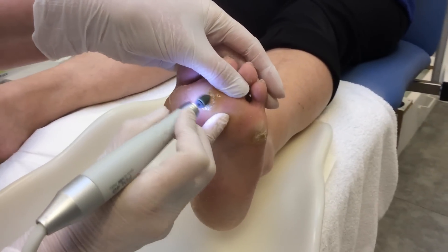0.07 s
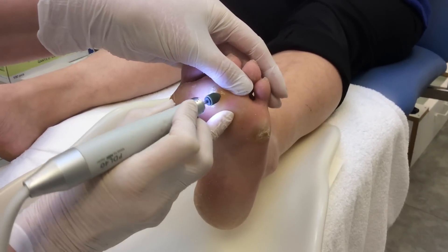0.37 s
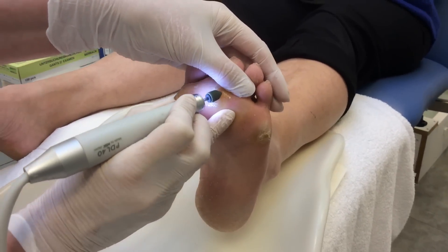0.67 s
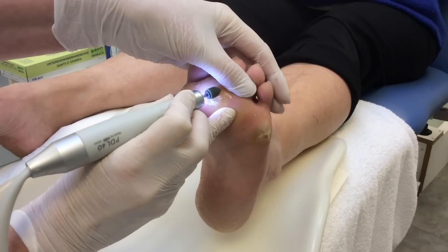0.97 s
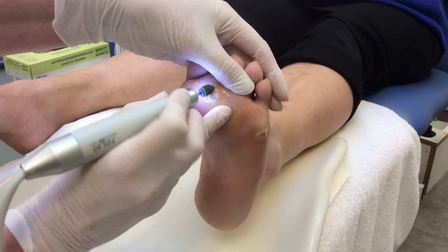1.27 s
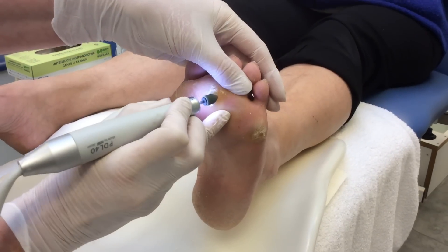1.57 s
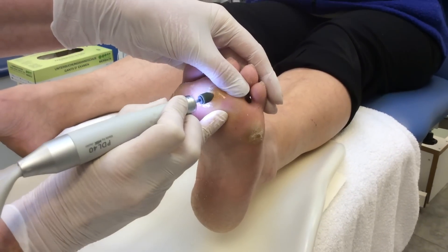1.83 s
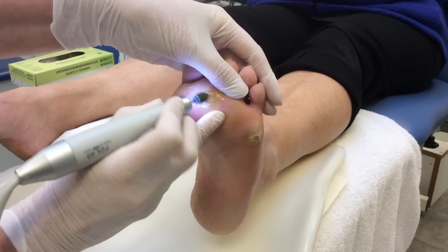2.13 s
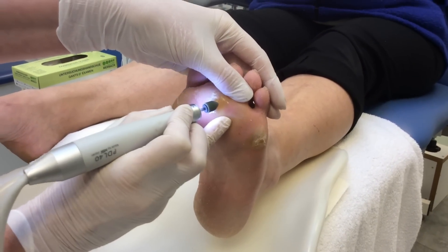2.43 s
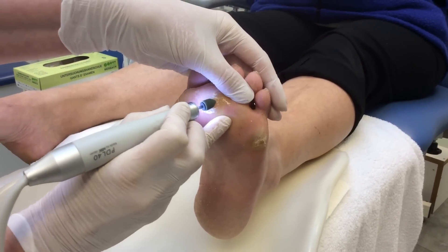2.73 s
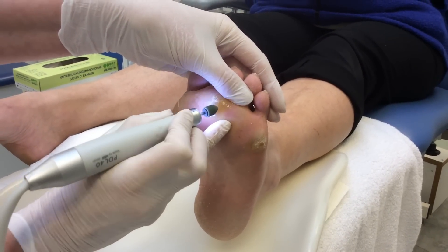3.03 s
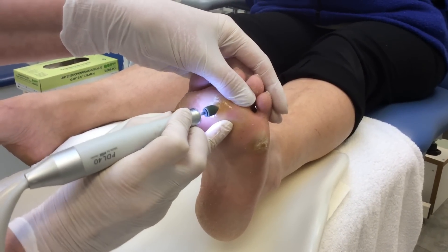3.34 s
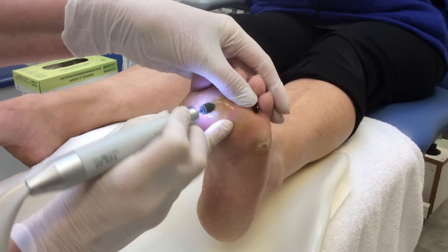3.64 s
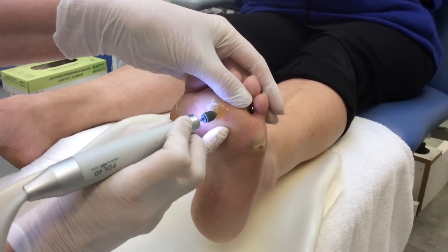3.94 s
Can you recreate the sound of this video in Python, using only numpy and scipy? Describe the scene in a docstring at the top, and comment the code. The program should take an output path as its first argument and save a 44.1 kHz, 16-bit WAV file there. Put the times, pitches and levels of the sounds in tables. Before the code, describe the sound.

Electric foot drill grinds hard skin four times, buzzing and squealing over a humming suction pump.

```python
"""A pedicure drill buzzes, squeals and rasps against hard skin, close by, in four strokes.
The burr slows under load. Once a turn it knocks the handpiece into ringing and drags its grit
over the skin, now and then catching an edge. Behind it the suction pump throbs steadily
over faint mains hum, and air hisses into the nozzle above the low rush of the room."""
import sys
import numpy as np
from scipy import signal
from scipy.fft import rfft, irfft
from scipy.io import wavfile
from scipy.ndimage import uniform_filter1d, map_coordinates

SR = 44100
rng = np.random.default_rng(int(sys.argv[2]) if len(sys.argv) > 2 else 0)


def generate_wav(signal):
    """Clip the signal to [-1, 1] and save it as 16-bit WAV at the path in sys.argv[1]."""
    frames = np.transpose(np.atleast_2d(signal))
    scaled = np.clip(frames, -1, 1) * 32767
    pcm = np.round(scaled).astype(np.int16)
    wavfile.write(sys.argv[1], SR, pcm)


N = 176400


def undb(db):
    """Decibels to gain."""
    return 10 ** (np.asarray(db) / 20)


def unit(x):
    """Scale to rms 1."""
    return x / np.sqrt(np.mean(x ** 2))


def walk(rate_hz):
    """Smooth random drift, spread near 1."""
    hold = int(SR / rate_hz)
    steps = np.repeat(rng.standard_normal(N // hold + 1), hold)
    return 1.296 * uniform_filter1d(uniform_filter1d(steps, hold), hold)[:N]


def colour(x, curve):
    """Minimum-phase filter through (freq_hz, gain_db) points; rms 1."""
    hz, db = np.array(curve, float).T
    bins_hz = np.maximum(np.fft.rfftfreq(N, 1 / SR), 1)
    gain = undb(np.interp(np.log(bins_hz), np.log(hz), db))
    cepstrum = irfft(np.log(gain), N)
    cepstrum[1:N // 2] *= 2
    cepstrum[N // 2 + 1:] = 0
    return unit(irfft(rfft(x) * np.exp(rfft(cepstrum)), N))


def ring(x, modes):
    """Drive damped (pitch_hz, width_hz, gain_db) resonances; rms 1."""
    s = 1j * np.fft.rfftfreq(N, 1 / SR)
    response = sum(undb(db) * width * s / (s * s + width * s + hz * hz) for hz, width, db in modes)
    return unit(irfft(rfft(x) * response, N))


def swells(t, rows):
    """Sum of bell-shaped gains."""
    return sum(undb(db) * np.exp(-((t - centre_s) / half_s) ** 2) for centre_s, half_s, db in rows)


def contact(t, stroke, release_s=0.014):
    """Knocking and rubbing gains of one stroke, fading quickly outside it."""
    time_s, knock_db, rub_db = np.array(stroke).T
    outside_s = np.maximum(0, np.maximum(time_s[0] - t, t - time_s[-1]))
    fade = np.exp(-outside_s / release_s)
    return [undb(np.interp(t, time_s, db)) * fade for db in (knock_db, rub_db)]


# Skin contact, one list per stroke: time_s, knock_db, rub_db
STROKES = [
    [(0.325, -78, -51.5), (0.335, -72, -46), (0.385, -82, -47.5), (0.495, -76, -48), (0.539, -55, -47.5),
     (0.567, -56, -47.5), (0.599, -60, -46.5), (0.637, -56.5, -47), (0.751, -54.5, -48.5),
     (0.783, -51.5, -45), (0.903, -54.5, -52), (1.055, -60, -50.5), (1.155, -55.5, -49.5),
     (1.207, -61.5, -53.5), (1.263, -61, -48.5), (1.32, -78, -52)],
    [(1.6, -81, -53), (1.624, -71, -46.5), (1.838, -70.5, -43.5), (1.852, -79, -42), (1.884, -51, -45.5),
     (1.912, -57.5, -48.5), (1.966, -57, -46), (2.018, -59, -41.5), (2.084, -56.5, -42.5), (2.16, -67, -53)],
    [(2.41, -75, -53), (2.42, -87, -48), (2.464, -65, -49), (2.54, -56.5, -46), (2.586, -57, -47.5),
     (2.722, -53.5, -44.5), (2.77, -59, -43.5), (2.79, -52, -45), (2.896, -55, -53.5), (2.93, -54, -45.5),
     (2.962, -58, -43), (2.985, -74, -52)],
    [(3.2, -73, -52), (3.206, -84, -56), (3.244, -66, -50.5), (3.296, -66, -52), (3.334, -63, -44),
     (3.368, -62, -53), (3.542, -48.5, -43), (3.562, -60, -49), (3.57, -51.5, -47.5), (3.644, -57, -54),
     (3.666, -50.5, -50), (3.684, -66, -47.5), (3.712, -64, -51), (3.715, -73, -61)],
]
# Grip, one row per stroke: squeal_hz, squeal_gain_db, buzz_gain_db, whine_gain_db
GRIPS = [(2000, -1, -6, -16), (2110, -2, -6, -11), (2050, -3.5, -5, -16.5), (1900, -3.5, -6, -12.5)]
# Light brushes of the burr: centre_s, half_width_s, level_db
LIGHT_BRUSHES = [(0.03, 0.055, -50.5), (4.0, 0.026, -51.5)]
# Burr catching an edge: centre_s, half_width_s, level_db
EDGE_CATCHES = [(0.398, .02, -46.5), (.8, 0.026, -54), (1.833, 0.017, -48), (2.035, 0.024, -62),
                (2.535, 0.023, -53), (2.736, 0.034, -56)]
# Burr shank resonances: pitch_hz, width_hz, gain_db
SHANK_MODES = [(3260, 80, -1.5), (4940, 300, -4.5), (5370, 87, -8), (6600, 100, -3.5)]
# Burr head resonances: pitch_hz, width_hz, gain_db
HEAD_MODES = [(4750, 200, -2), (6500, 710, -2), (8600, 2000, 12), (10700, 900, -8)]
# Spectrum of grit on skin: freq_hz, gain_db
RASP_CURVE = [(300, -23.5), (1200, -13), (2600, -9.5), (3250, -6.5), (3650, -6), (4100, -3), (4700, -3.5),
              (5250, -6), (5800, 2.5), (6150, -0.5), (6550, 0), (7200, -3), (8700, 1.5), (9800, -3),
              (10900, 0), (13000, -7), (15500, -22.5)]


def drill(t, squeal_width_hz=347, drag_gain_db=-22, rasp_gain_db=0.06, tick_gain_db=-17.5):
    """Each turn the burr knocks and scrapes, ringing handpiece, shank and head over the motor's buzz."""
    speed_hz, turns = rotation(t)
    knock_scatter, bite_scatter = rng.standard_normal((N // 100, 2)).T  # indexed by turn
    pulses = knock_pulses(speed_hz, turns, knock_scatter)
    scrape = grit(t, turns, bite_scatter)
    knocks = unit(pulses) + 0.36 * scrape
    buzz = motor(turns)
    whine = ring(knocks, SHANK_MODES)
    pressure = swells(t, LIGHT_BRUSHES)
    handpiece = np.zeros(N)
    for stroke, (squeal_hz, squeal_db, buzz_db, whine_db) in zip(STROKES, GRIPS):
        knocking, rubbing = contact(t, stroke)
        mode = [(squeal_hz, squeal_width_hz, 0)]
        squeal = ring(ring(knocks, mode), mode)
        handpiece += squeal * knocking * undb(squeal_db)
        handpiece += buzz * (knocking * undb(buzz_db) + rubbing * undb(drag_gain_db))
        handpiece += whine * rubbing * undb(whine_db)
        pressure += rubbing
    rasp = colour(scrape, RASP_CURVE) * pressure * undb(rasp_gain_db)
    ticks = ring(pulses, HEAD_MODES) * (pressure * undb(tick_gain_db) + swells(t, EDGE_CATCHES))
    return handpiece + rasp + ticks


# Burr speed, one list per stroke: time_s, speed_hz
BURR_SPEED = [
    [(.32, 194), (.39, 180), (.46, 174), (.51, 155), (.56, 153), (.6, 146), (.65, 159), (.72, 150),
     (.78, 151.5), (.86, 140), (.91, 143.5), (.97, 140), (1.04, 144.5), (1.11, 151.5), (1.18, 156),
     (1.25, 165), (1.32, 188)],
    [(1.59, 192), (1.71, 177.5), (1.77, 177), (1.82, 165), (1.9, 168.5), (2.02, 165.5), (2.1, 160),
     (2.16, 188)],
    [(2.41, 194), (2.49, 176), (2.62, 162.3), (2.71, 163.3), (2.76, 165.3), (2.8, 163.7), (2.86, 166),
     (2.92, 162), (2.98, 186)],
    [(3.19, 194), (3.25, 182.5), (3.3, 180), (3.4, 165), (3.45, 163.8), (3.49, 161.7), (3.56, 164),
     (3.64, 165), (3.72, 188)],
]


def rotation(t, jitter=0.003):
    """The burr slows under load; returns its speed and running count of turns."""
    speed_hz = np.interp(t, *np.vstack(BURR_SPEED).T)
    speed_hz = uniform_filter1d(speed_hz, SR // 50) * (1 + jitter * walk(60))
    return speed_hz, np.cumsum(speed_hz) / SR


def knock_pulses(speed_hz, turns, scatter, scatter_db=1):
    """One band-limited knock a turn, uneven in strength."""
    nearest = np.round(turns).astype(int)
    offset_samples = (turns - nearest) * SR / speed_hz
    pulses = np.sinc(offset_samples) * np.exp(-(offset_samples / 4) ** 2)
    return pulses * undb(scatter_db * scatter[nearest])


def grit(t, turns, scatter, repeat_share=0.79, wear_per_s=16, bite_decay_turns=0.2, grain_db=3.5):
    """Grit bites once a turn; its roughness comes round again, changing as the skin wears."""
    size = 256
    surface = rng.standard_normal((size, size))
    position = [t * wear_per_s, turns % 1 * size]
    repeating = unit(map_coordinates(surface, position, order=3, mode="grid-wrap"))
    drag = np.sqrt(repeat_share) * repeating + np.sqrt(1 - repeat_share) * rng.standard_normal(N)
    bite_db = -3 + 2 * scatter[turns.astype(int)]
    bite = 1 + np.exp(-(turns % 1) / bite_decay_turns) * undb(bite_db)
    return unit(drag * bite * undb(grain_db * walk(4000)))


# Buzz of the loaded motor: shaft_multiple, gain_db
MOTOR_PARTIALS = [(4, -4.5), (5, -6), (6, -3.5), (7, -7), (8, 0), (9, -4), (10, -1.5), (11, -5), (14, -2),
                  (15, -7.5), (19, -6.5), (20, -5.5)]


def motor(turns, flutter_db=3.5):
    """Partials locked to the shaft, each wavering in level by itself."""
    buzz = np.zeros(N)
    for multiple, db in MOTOR_PARTIALS:
        partial = np.sin(2 * np.pi * (multiple * turns + rng.random()))
        buzz += partial * undb(db + flutter_db * walk(29.93))
    return unit(buzz)


# Suction pump throb: harmonic, gain_db
PUMP_PARTIALS = [(1, -17.5), (2, -14.5), (3, -15.5), (4, -15.5), (5, -21), (6, -28.5), (7, -4), (8, 1),
                 (9, -19.5), (10, -15.5), (11, -11.5), (12, -22.5), (13, -12.5), (14, -30.5), (15, -17.5),
                 (16, -20.5), (17, -13.5), (18, -16), (19, -12), (20, -17), (21, -33), (22, -23), (23, -21)]


def pump(rate_hz=45.22, level_db=-54, wander=0.00069, offset_s=0.02, delay_s_per_khz=0.00808):
    """The pump throbs once a cycle; its upper partials arrive later, blurred by the room."""
    cycles = np.cumsum(rate_hz * (1 + wander * walk(4.9))) / SR - offset_s * rate_hz
    throb = np.zeros(N)
    for harmonic, db in PUMP_PARTIALS:
        hz = harmonic * rate_hz
        lag_cycles = delay_s_per_khz / 1000 * hz ** 2 / 2
        lag_cycles += rng.uniform(-.5, .5) * (hz / 900) ** 2  # phase fully random from 900 Hz up
        throb += undb(db) * np.sin(2 * np.pi * (harmonic * cycles - lag_cycles))
    return unit(throb) * undb(level_db)


def mains_hum(t, pitch_hz=99.9, level_db=-72.5):
    """Mains hum, beating against the pump."""
    return unit(np.sin(2 * np.pi * pitch_hz * t)) * undb(level_db)


# Spectrum of air at the nozzle: freq_hz, gain_db
NOZZLE_CURVE = [(880, -35), (1500, -12.5), (1680, -14.5), (1750, -21), (1960, -13.5), (2250, -15),
                (2890, -15), (3270, -13.5), (4290, -8.5), (6240, -6), (8660, -3), (9450, -2), (15000, -2)]


def nozzle_hiss(level_db=-47.5, flutter_db=0.15):
    """Air drawn into the nozzle hisses steadily."""
    return colour(rng.standard_normal(N), NOZZLE_CURVE) * undb(level_db + flutter_db * walk(15))


# Spectrum of the room: freq_hz, gain_db
ROOM_CURVE = [(25, -12), (60, -7.5), (150, -1.5), (260, -1), (400, 2), (800, -7), (1200, -3.5),
              (2000, -18.5), (5000, -75)]


def room_rush(level_db=-65.5):
    """Low, steady rush of the room."""
    return colour(rng.standard_normal(N), ROOM_CURVE) * undb(level_db)


def scene():
    """Drill over pump, hum and air, the same in both channels."""
    t = np.arange(N) / SR
    mix = drill(t) + pump() + mains_hum(t) + nozzle_hiss() + room_rush()
    return np.tile(mix, (2, 1))


def record(dry):
    """Steep low-pass at 15.3 kHz."""
    return signal.sosfilt(signal.ellip(12, .1, 80, 15300, fs=SR, output="sos"), dry)


dry = scene()
out = record(dry)
generate_wav(out)
```